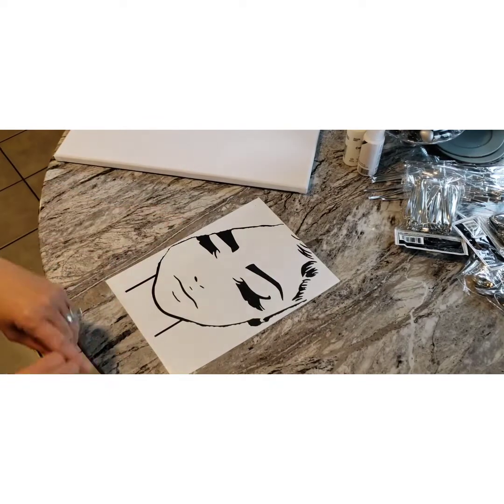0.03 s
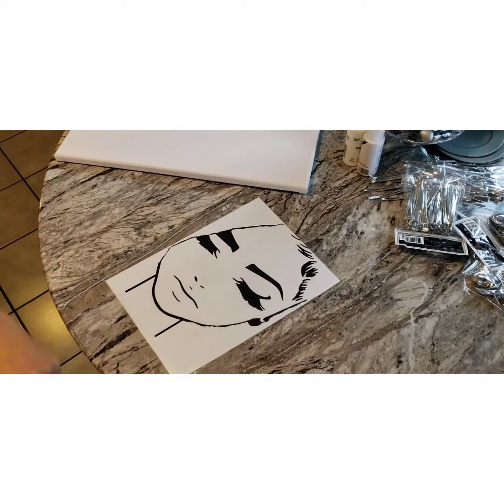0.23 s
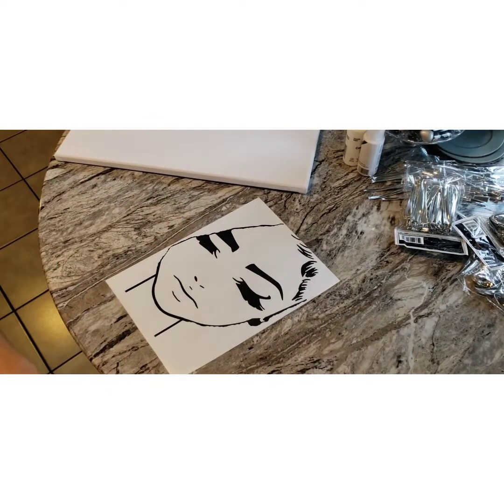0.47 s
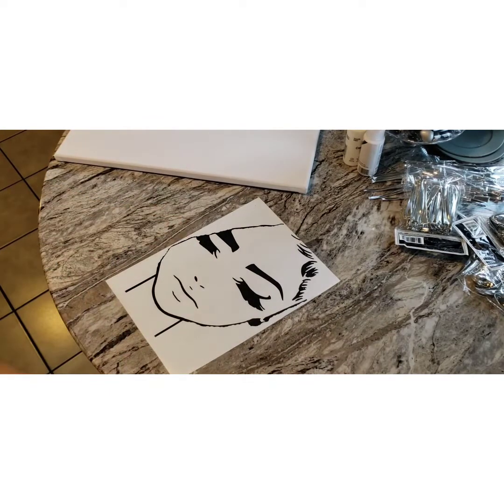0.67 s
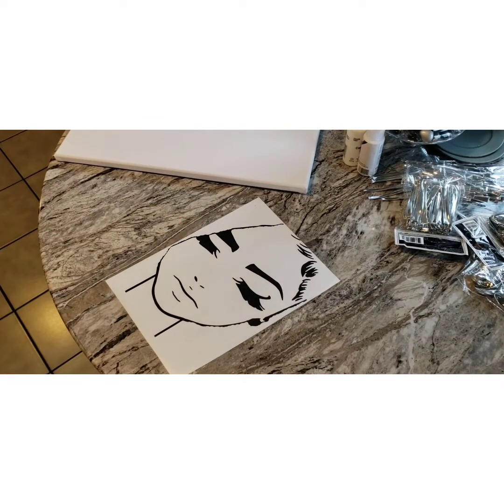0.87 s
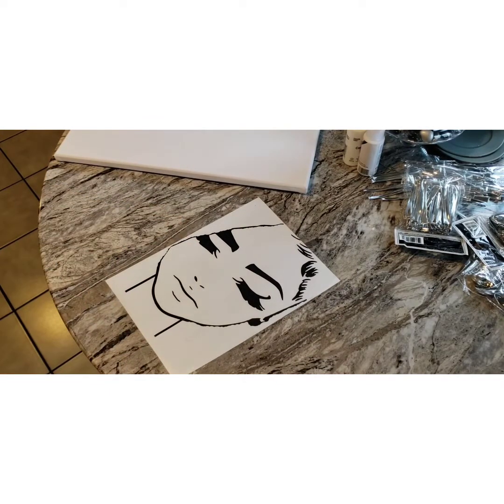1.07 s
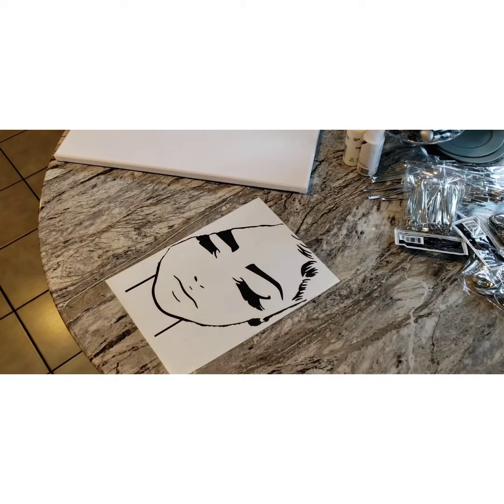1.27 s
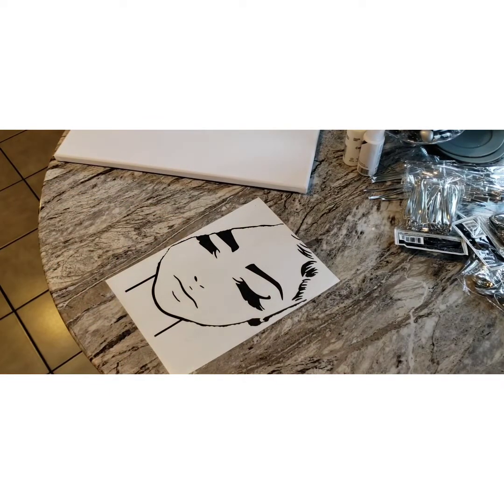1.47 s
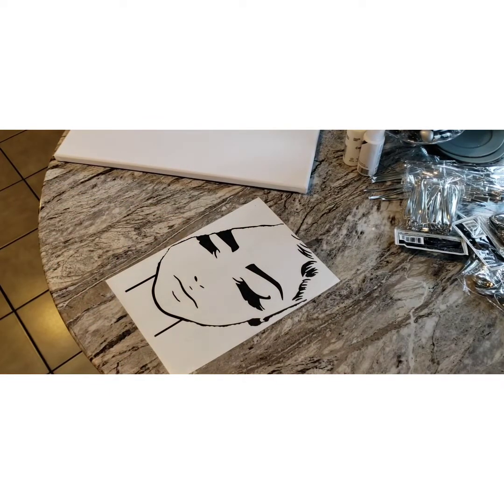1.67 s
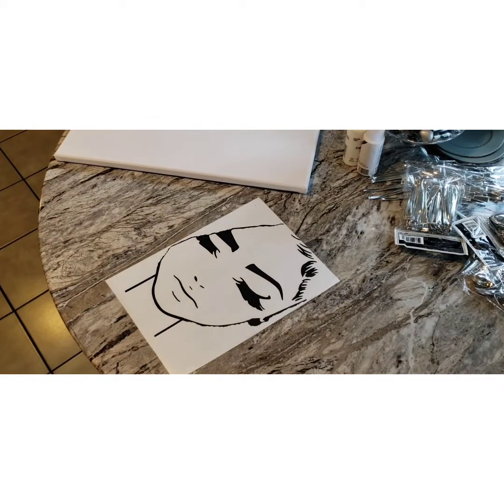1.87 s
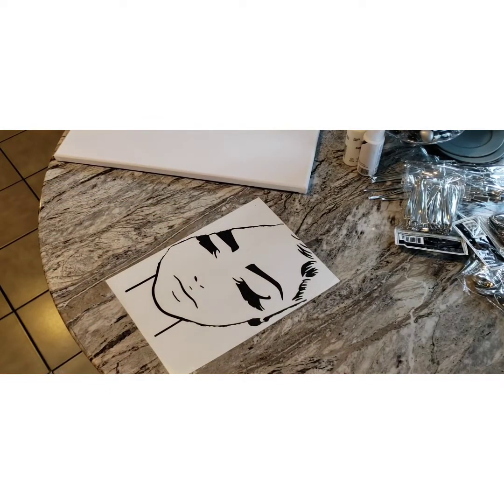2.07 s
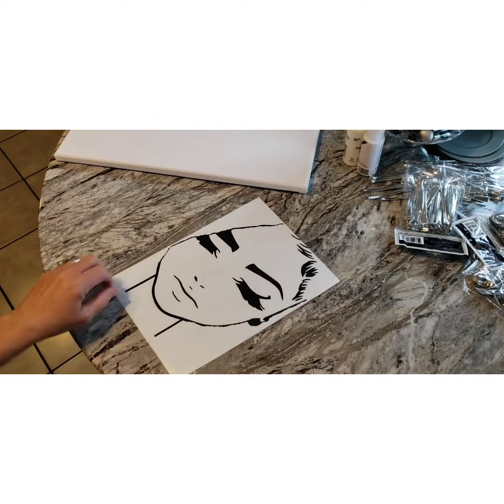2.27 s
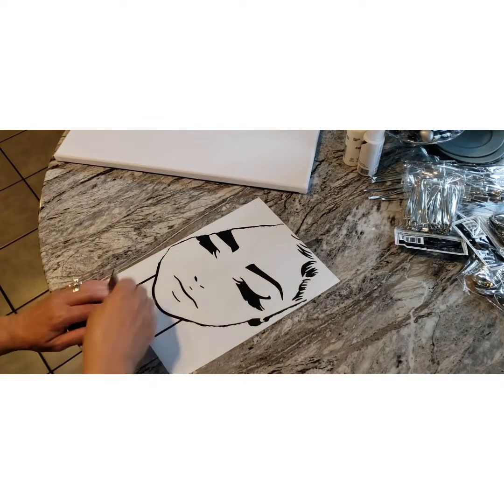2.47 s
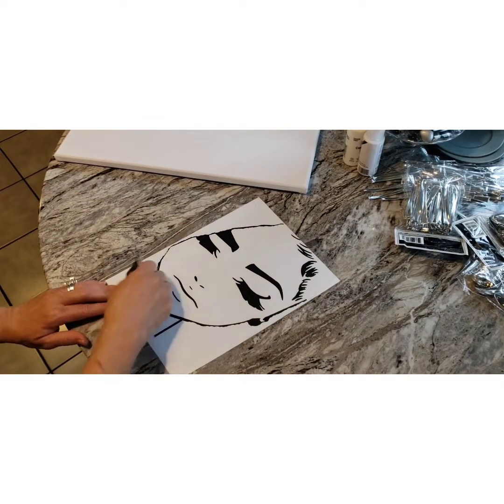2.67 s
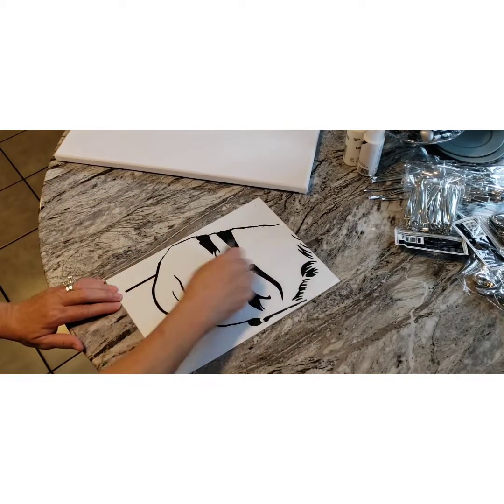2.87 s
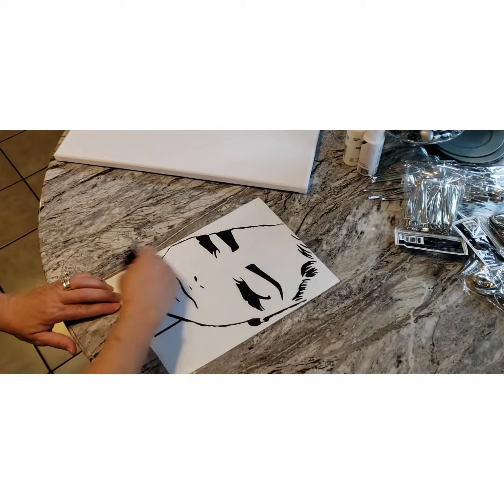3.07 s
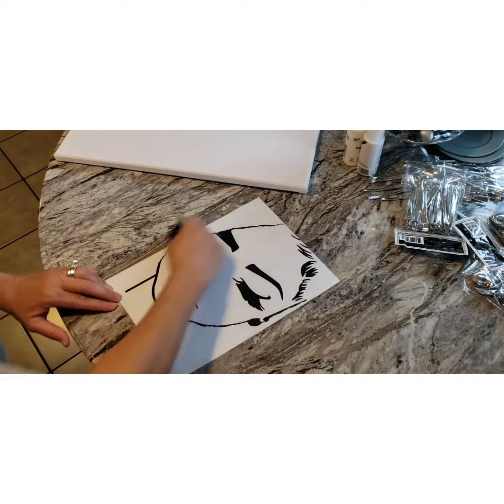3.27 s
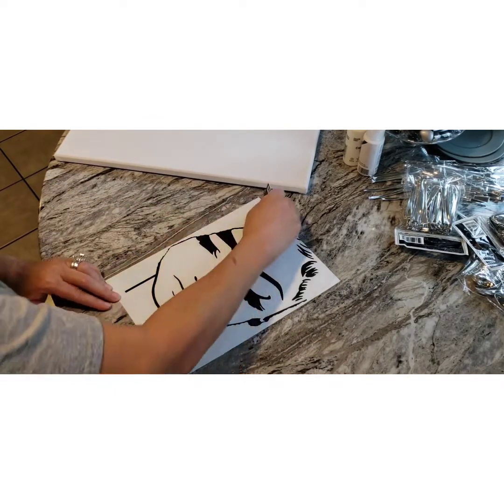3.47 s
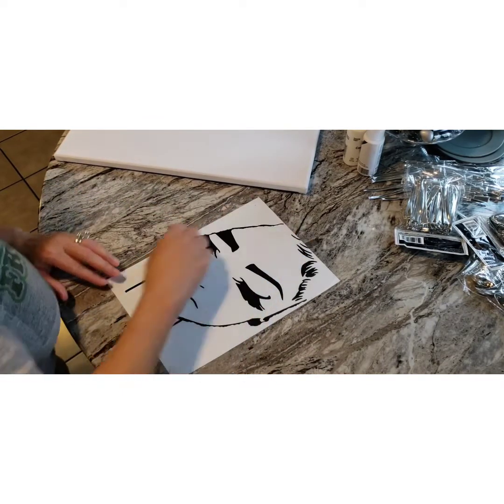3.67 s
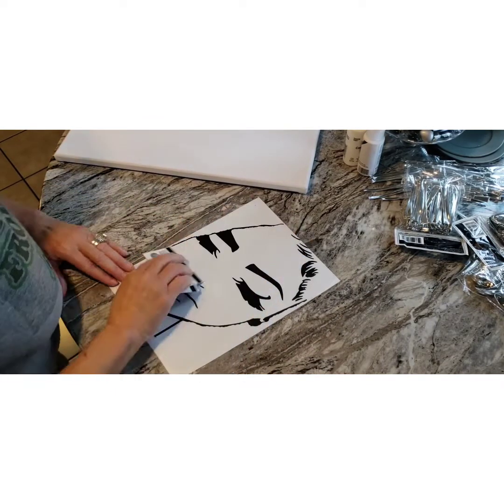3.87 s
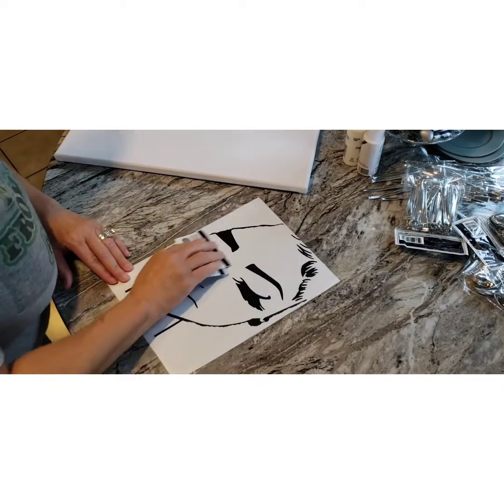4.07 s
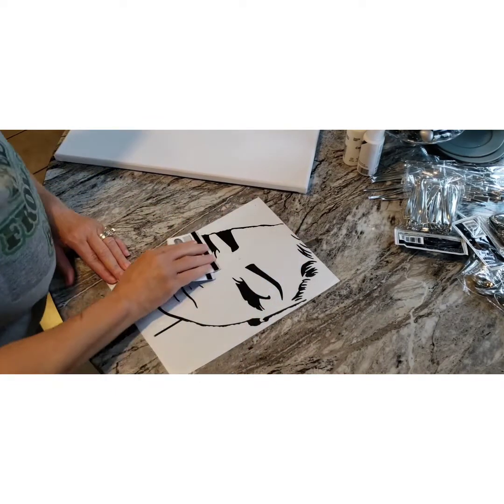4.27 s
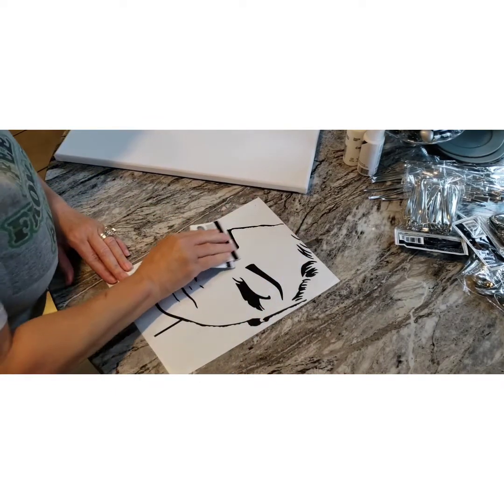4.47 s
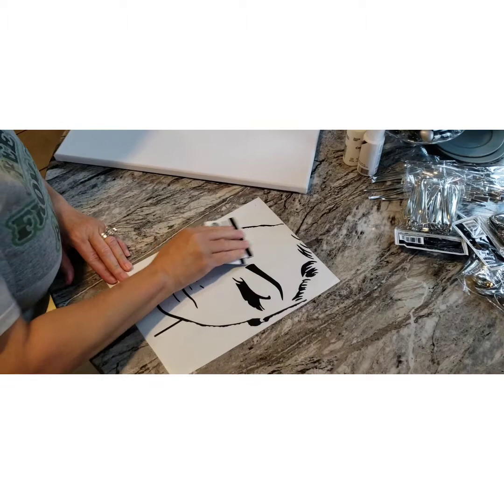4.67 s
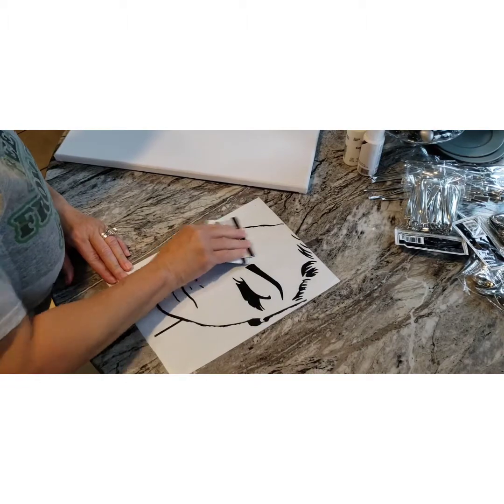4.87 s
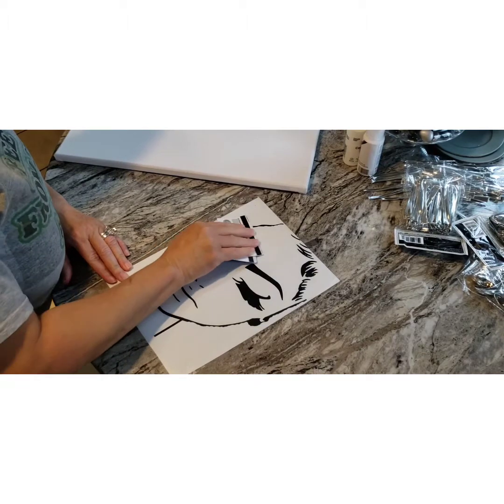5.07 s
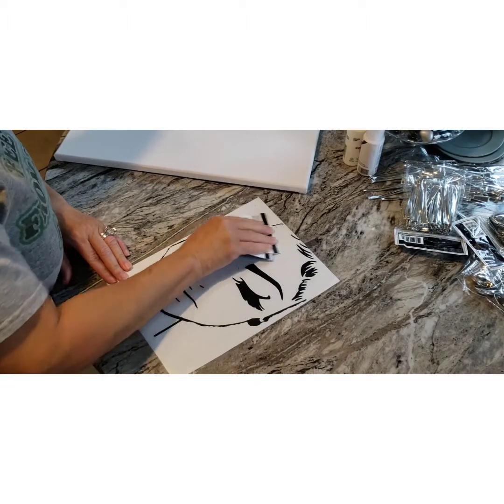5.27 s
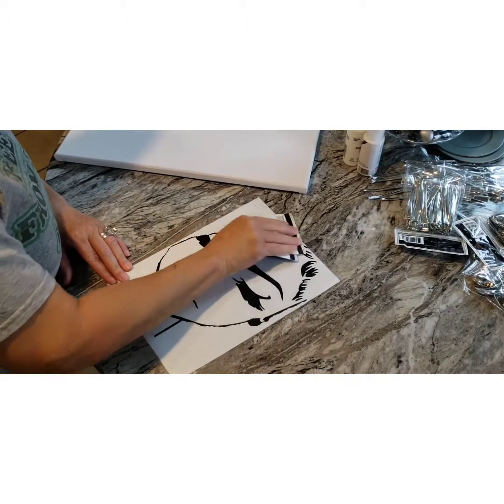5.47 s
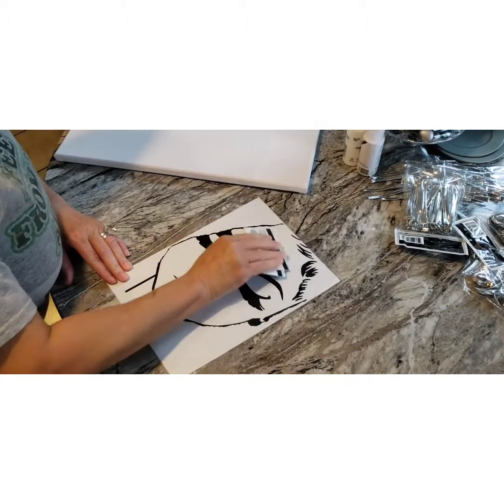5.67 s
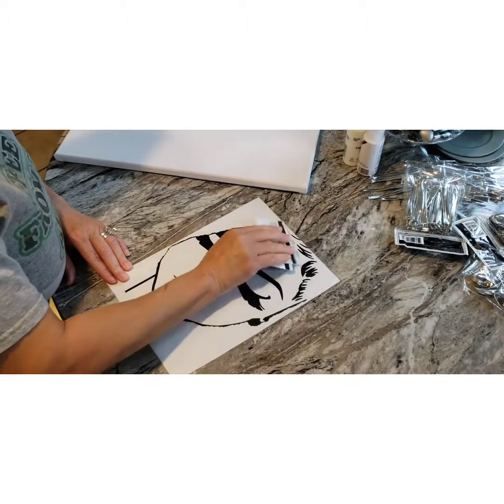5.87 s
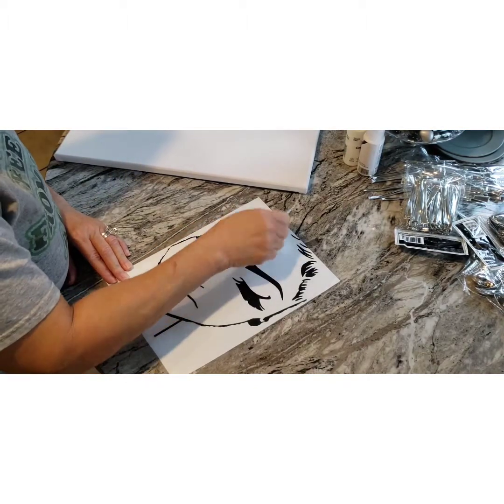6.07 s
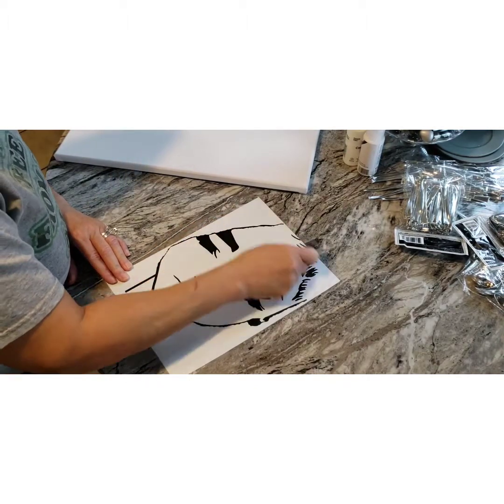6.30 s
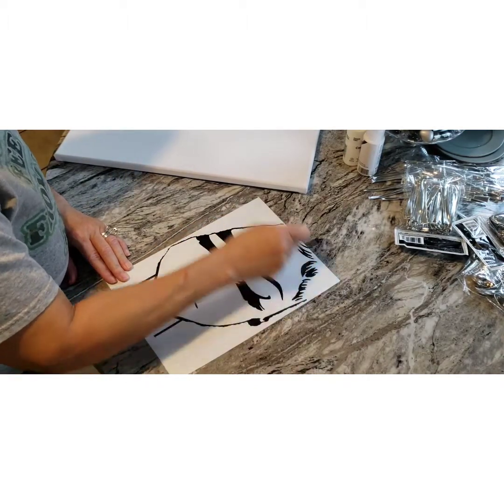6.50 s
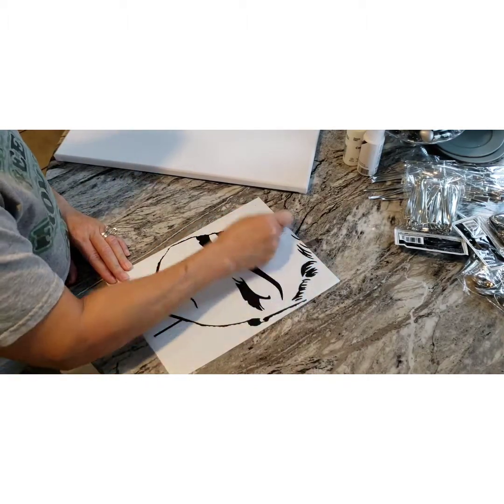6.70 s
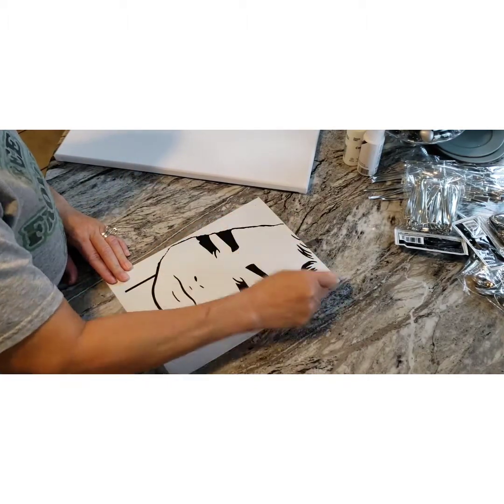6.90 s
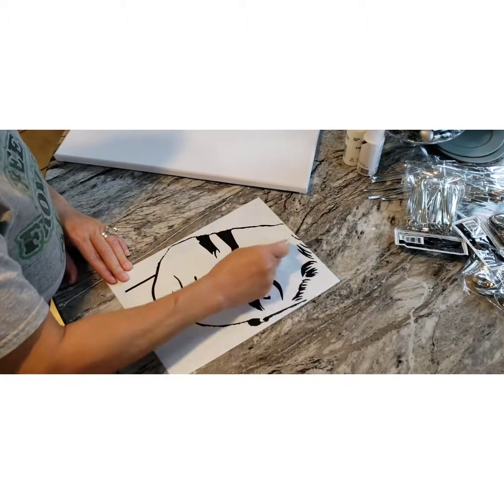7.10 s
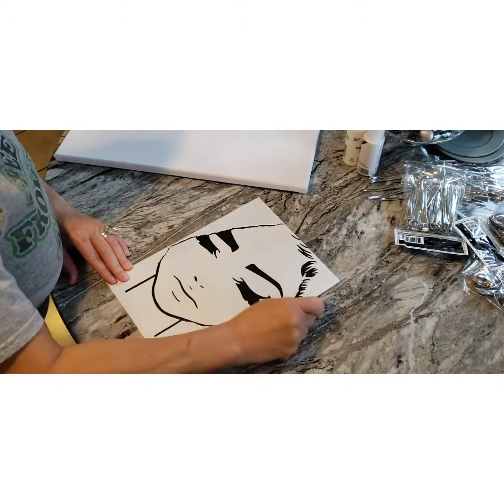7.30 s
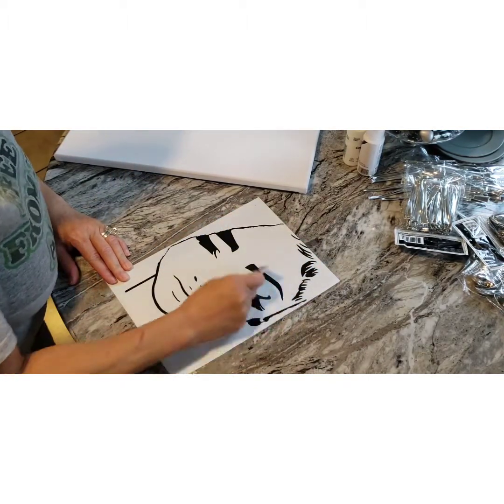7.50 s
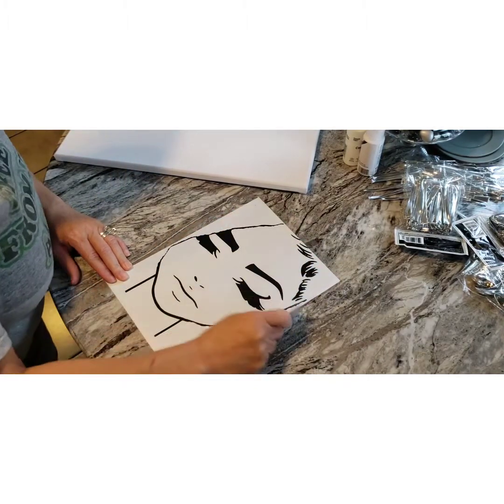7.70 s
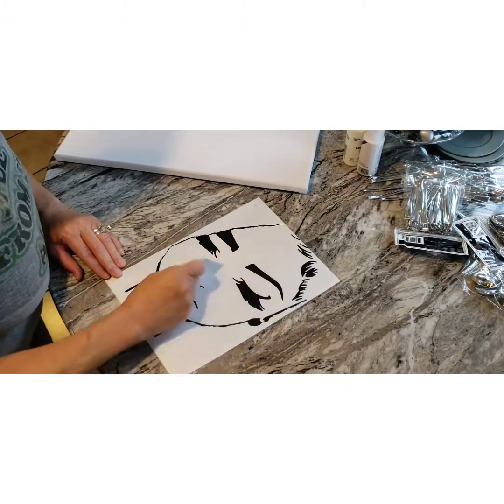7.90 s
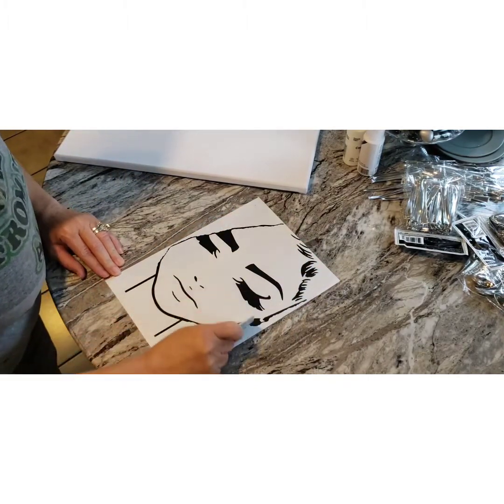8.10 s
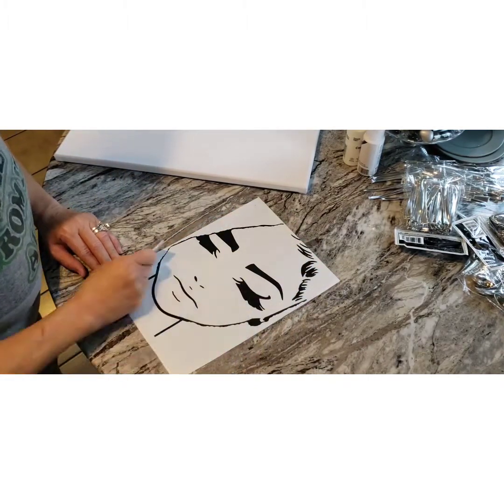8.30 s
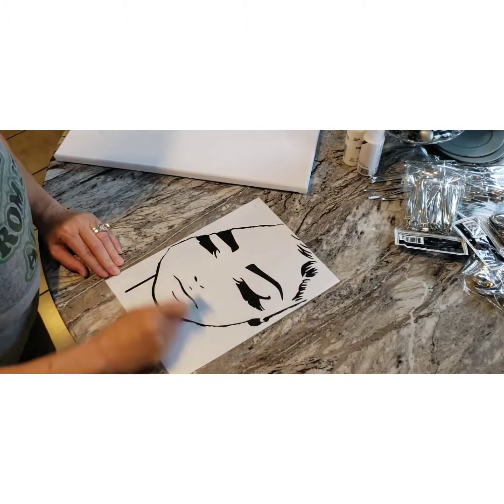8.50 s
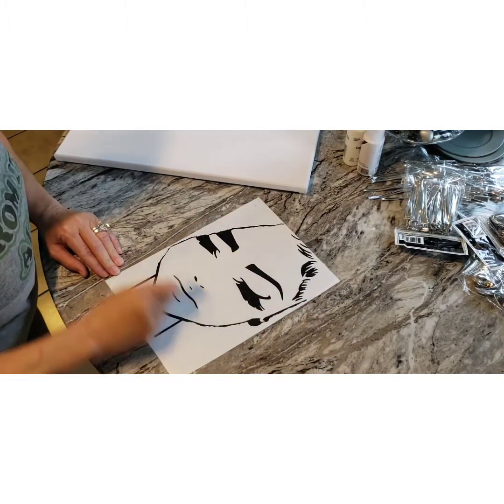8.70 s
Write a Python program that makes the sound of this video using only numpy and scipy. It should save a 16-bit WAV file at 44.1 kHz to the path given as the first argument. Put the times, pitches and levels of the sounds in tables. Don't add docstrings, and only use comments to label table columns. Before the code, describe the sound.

A close stereo phone pickup in a reverberant kitchen, with faint fridge hum and microphone hiss. From 0 to 2.5 s it is almost quiet: a paper and sleeve rustle fading at the start, tiny taps near 0.8 and 1.0, then arm and cloth brushing with a soft thud around 2.2. At 2.6 a plastic card clacks down and skids; from 2.8 to 3.5 it drags in loud, grating, chattering bursts with a honking midrange ring near 1.9 kHz. From 3.9 to 5.7 come about a dozen quick, drier to-and-fro rubs, softer, over low slab thumps. A near pause with light cloth rustle lasts until 6.15, when a clack and hissy skid arrive. Then separate firm scrapes come at 6.35, 6.65, 7.1, 7.5, 7.95 and 8.35, each with a sharp crack, raspy drag, occasional bright crackle and short hard-walled echo, continuing to the end at about 8.6.

```python
import sys
import numpy as np
from scipy import signal
from scipy.fft import rfft, irfft, next_fast_len
from scipy.io import wavfile
from scipy.ndimage import uniform_filter1d, map_coordinates

SR = 44100
rng = np.random.default_rng(int(sys.argv[2]) if len(sys.argv) > 2 else 0)


def nominal_scale(level):
    x = np.asarray(level, float) / 20
    return 10 ** x


def wrap_up_sound(samples):
    columns = np.atleast_2d(samples).T
    tamed = np.clip(columns, -1, 1)
    steps = np.round(tamed * 32767).astype(np.int16)
    wavfile.write(sys.argv[1], SR, steps)


N = 385821
STEP = 32
STEADY_TOP_HZ, TOP_HZ = 15800, 16500

# freq_hz, level_db per Hz
ROOM_TONE = [(15, -60), (28, -24.5), (45, -11), (100, -4), (147, -16), (180, 1.5), (210, -8), (300, -6),
             (400, -7.5), (540, -12), (700, -18), (900, -31), (1300, -42), (2000, -87)]
# freq_hz, likeness
ROOM_TONE_ALIKE = [(60, 0.73), (240, 0.76), (950, -0.31), (3770, -0.04), (15000, -0.35)]
ROOM_TONE_DB = -57
# freq_hz, level_db
FRIDGE_LINES = [(91.5, -78), (118.4, -72), (177.6, -66.5), (236.9, -80.5), (306.8, -74), (360.7, -71.5),
                (446.8, -76), (538.3, -78.5), (720, -85.5)]
# peak_s, level_db, coming_db_per_s, going_db_per_s
ARM_BRUSHES = [
    (0, -77, 99, 120),
    (.765, -71.5, 400, 170),
    (1.04, -85, 40, 40),
    (1.52, -89, 25, 25),
    (2.215, -69, 700, 60),
    (2.243, -66, 292, 200),
    (2.265, -67.5, 900, 130),
    (2.572, -67.5, 3000, 103),
]
# peak_s, level_db, coming_db_per_s, going_db_per_s
PAPER_BRUSHES = [(0, -59.5, 99, 180), (.77, -79, 280, 70), (.985, -80, 900, 200), (1.52, -81, 100, 120),
                 (2.21, -77.5, 700, 60.1), (2.26, -76.5, 170, 70), (2.49, -72.5, 160, 180),
                 (2.6, -73, 250, 900)]
# peak_s, level_db, coming_db_per_s, going_db_per_s
CLOTH_BRUSHES = [(0, -69, 99, 45), (.25, -68.5, 80, 60), (.51, -71.5, 75, 90), (.76, -78, 500, 25),
                 (1.04, -80, 22, 80), (1.52, -75.5, 95, 130), (2.35, -64, 110, 80),
                 (2.49, -65.5, 41.7, 100), (2.6, -67, 75, 600), (3.76, -71, 61, 90), (5.95, -71.5, 400, 30),
                 (6.05, -78, 60, 150)]
LAST_BRUSH_S = 6.2
# freq_hz, level_db per Hz
ARM_SPECTRUM = [(600, -19), (1000, 3), (1800, -1.5), (3000, -8), (6000, -38.5)]
PAPER_SPECTRUM = [(1500, -8), (2800, 1.5), (5000, -2.0), (8000, -14.0), (12000, -35)]
CLOTH_SPECTRUM = [(5000, -18.0), (9500, -8.5), (12000, -1.5), (15500, -7.5)]

# start_s, peak_db, then relative to it thud_db, snap_db, tick_db
LANDINGS = [(0.769, -76, 12, -12, -20), (0.985, -75, 4, -4, -9), (2.169, -78, 22, -7, -12),
            (2.26, -56, 0, -12, -15.5), (2.571, -61.5, 15.5, -17.5, -22), (2.607, -41, -4.5, -5, -11),
            (3.089, -29.5, -20, -41, -24), (3.37, -30, -14, -6.5, -26.5), (5.939, -62, -35, -21, -12),
            (6.148, -41, 6, -18.5, -10), (6.155, -35.5, -13, 0.5, -16.5), (6.642, -35, -14.5, -7, -23.5),
            (6.767, -28, -30, -2.5, -10.5), (7.105, -22.5, -12, -20, -25), (7.511, -28, -16, -4, -30.5),
            (7.93, -37.5, -15, -2.5, -9.5), (8.023, -30, -46, -18, -22.5), (8.333, -30, -10, -26, -23.5),
            (8.538, -29, -27, -3.5, -23)]
# freq_hz, width_hz, level_db
SLAB_STRUCK = [(149, 38, -2.5), (250, 130, -8.5), (396, 67, -4), (458.3, 26, 1), (680, 44, -8.5)]
# freq_hz, width_hz, level_db
SLAB_ROCKED = [(177, 31, -6.0), (231, 61, -2.5), (378, 24.0, -1.5), (468.0, 29, -2.0), (664, 79, -15.5)]
# start_s, low_db, dying_db_per_s, upper_over_low_db, cabinet_over_low_db
JOLTS = [
    (6.158, -41, 398, -9, -26),
    (6.645, -55, 78, 4, -13),
    (7.11, -43, 110, -22, -11),
    (7.515, -43.5, 194, -2.5, -8),
    (7.935, -50.5, 130, 2.5, -7),
    (8.34, -50.5, 113, 2.5, -3),
]
# peak_s, low_db, swell_db_per_s, upper_over_low_db, cabinet_over_low_db
LEANS = [(2.602, -59, 95, 3, -4), (2.906, -55.5, 174, 8, -20), (3.12, -65, 93, 3.5, 1),
         (3.44, -53, 91, -1, -10), (3.94, -56.5, 126, 6, -6), (4.045, -46.5, 220, -3.5, -13),
         (4.1, -43, 250, -10.5, -18), (4.19, -45, 300, -10.5, -12), (4.38, -56, 115, 2.5, -7),
         (4.46, -64, 90, 7, -10), (4.56, -61, 40, 3, -17), (4.69, -53.5, 123, 0.5, -16),
         (4.79, -56, 200, -4, -15), (4.86, -55.5, 90, -5, -15), (4.96, -60, 40, 4.5, -12),
         (5.07, -57, 120, 4.5, -5), (5.2, -63, 98, 15.5, -10), (5.27, -51.5, 170, -5, -10),
         (5.34, -65.5, 150, 11.5, -8), (5.4, -61, 150, 7.5, -15), (5.48, -55, 200, 8.5, -14),
         (5.52, -40, 234, -8, -9), (5.6, -48.5, 154.5, -11.5, -9.5), (6.3, -56.5, 32, 7, -9.5),
         (6.8, -51, 58, -0.5, -20), (6.923, -47.5, 150, -1, -13), (7.66, -62.5, 88, 11, -25),
         (8.1, -71.5, 66, 15.5, -13), (8.58, -66, 80, 1, -8)]
JOLT_HOLD_S, UPPER_PACE, BUMP_PACE = 0.032, 0.99, 0.54

# ratio to the note, relative width, level_db
CARD_MODES = [(1.041, 0.27, 9.5), (1.64, 0.22, 3), (0.853, 0.2, 5), (3.9, 0.33, -17.5)]
# freq_hz, level_db per Hz
RASP = [(650, -50.5), (1100, -12), (1570, -5.5), (2830, 1), (3670, -3), (4900, -6.5), (8000, -25),
        (10400, -55), (17600, -120)]
# freq_hz, level_db per Hz
EDGE_HISS = [(2350, -25), (4000, -11), (5230, -4.5), (6270, -7), (8730, -8.5), (10800, -5), (15600, -9.5)]
# freq_hz, likeness
SCRAPE_ALIKE = [(500, 0.8), (1000, 0.4), (1800, 0.26), (3000, 0.15), (7000, 0.043), (14000, 0.022)]
# freq_hz, left_over_right_db
LEFT_OVER_RIGHT = [(60, -2), (240, -16), (950, 0.0), (3770, 0.5), (15000, -4)]
# start_s, level_db, dying_db_per_s
SKIDS = [
    (2.608, -46, 156),
    (3.083, -34.5, 193),
    (5.938, -61.5, 300),
    (6.153, -45.5, 46.5),
    (6.641, -57, 120),
    (7.105, -34.5, 421),
    (7.51, -35, 257.5),
    (7.93, -49, 70),
    (8.335, -43, 163),
]
# bite_s, lift_s, bite_db, lift_db, onset_db_per_s
DRAGS = [(2.775, 2.84, -44, -35.5, 449.5), (2.85, 2.898, -35.5, -30, 600.5), (3.2, 3.25, -42, -35.5, 249.5),
         (3.258, 3.335, -35.5, -36, 599.5), (3.35, 3.455, -36.5, -31.5, 200.5),
         (6.358, 6.395, -40, -41.5, 215), (6.4, 6.45, -40.5, -51, 600), (6.772, 6.89, -37, -33, 168.5),
         (7.163, 7.233, -40.5, -35.5, 598), (7.235, 7.296, -36, -32, 598.5), (7.57, 7.665, -40, -37, 212.5),
         (7.985, 8.035, -37.5, -30.5, 601), (8.04, 8.125, -31.5, -42, 600),
         (8.49, 8.545, -35.5, -34.5, 244.5), (8.55, 8.605, -32, -37.5, 602)]
# start_s, level_db, onset_db_per_s, dying_db_per_s, hold_s
RUBS = [(3.86, -49.5, 600, 128, 0.0057), (4.02, -51.5, 340, 209, 0.1), (4.23, -50.5, 300, 179, 0.0048),
        (4.4, -47, 271, 195, 0.011), (4.535, -54.5, 200, 245, 0.0073), (4.68, -47.5, 389, 190, 0.0053),
        (4.795, -56.5, 200, 225, 0.0039), (4.94, -46.5, 334, 198, 0.005), (5.05, -56.5, 154, 229, 0.0047),
        (5.185, -47, 489, 232, 0.014), (5.305, -57, 215, 290, 0.0061), (5.45, -48, 398, 178, 0.012),
        (5.585, -43.5, 548, 229, 0.0093)]
# time_s, note_hz, edge sharpness hiss_db, ringing 0-1, sheet looseness sheet_db
GRIP = [(2.62, 1930, -9, 0, -2.5), (2.78, 1836, -14, 1, 5), (2.9, 2080, -7, 0.88, -7.5),
        (3.1, 1790, -10, 0.87, -7), (3.27, 2000, -12.5, 1, -4), (3.45, 2040, -10, 0.93, -4.5),
        (3.86, 1880, -13, 0.18, -5.5), (4.06, 1780, -7, 0.63, 4), (4.4, 1870, -4.5, 0.25, -3.5),
        (4.95, 1870, -3.5, 0.3, 1.5), (5.6, 1715, -6, 0.39, -1), (5.94, 1550, -24, 1.2, -3.5),
        (6.22, 2070, 1.5, 0.85, 2), (6.37, 1795, -6, 0.72, 10), (6.85, 1840, -4.5, 0.44, 1.5),
        (7.2, 1670, -8.5, 0.89, 2.5), (8.0, 1670, -9.5, 0.96, 2.5), (8.55, 1833, -6, 0.71, 1.7)]
SKID_NOTE, SKID_RING, SKID_SHEET_DB = 1.04, -0.34, -4.5
SKID_HISS_DB = -3
DRAG_SHEET_DB, SHEET_LEAD, RUB_SHEET_DB = -13.5, 0.63, -6.5
HISS_FADE_DB_S, HISS_FADE_MAX_DB, RING_FADE_S = 43, 36, 1.45
LAND_DB_S, LIFT_DB_S = 12000, 198
BITE_HISS_DB, BITE_S, DRAG_RING_LOSS = -4, 0.035, 0.19
BEND, SAG_PER_S = 0.046, .4

# start_s, peak_db, note_hz
PLUCKS = [(2.777, -35, 1610), (2.7945, -29, 1650), (2.8534, -22.5, 2130), (2.8654, -23, 2010),
          (2.8854, -21, 1900), (2.8944, -22, 1920), (3.0942, -22.5, 1856), (3.108, -24, 1930),
          (3.2053, -31, 1880), (3.2306, -22, 1720), (3.254, -18, 2034), (3.2694, -20, 2020),
          (3.2931, -20.5, 1960), (3.3712, -21.5, 2250), (3.4411, -33, 2020), (3.4554, -28, 2070),
          (5.5816, -35, 1580), (5.5944, -32, 1580), (6.356, -36, 1780), (6.6548, -29.5, 2100),
          (6.7575, -28, 1940), (6.8059, -29, 1560), (6.8489, -26, 1820), (6.8953, -24, 1485),
          (7.1652, -39, 1900), (7.2476, -19.5, 1710), (7.2784, -29, 1800), (7.294, -29, 1540),
          (7.5722, -25.5, 1570), (7.6225, -30, 1880), (7.65, -37, 1530), (7.9818, -24, 1880),
          (7.9912, -19.5, 1714), (8.0025, -17, 1723), (8.0274, -28, 1700), (8.0384, -28, 1670),
          (8.0628, -26, 1710), (8.454, -30, 1620), (8.4902, -21, 1860), (8.564, -30, 2010),
          (8.5954, -22, 1660)]
PLUCK_T60_S, PLUCK_RISE_S, PLUCK_DB = .035, 0.001, -5
# start_s, peak_db, length_s
CATCHES = [
    (3.37, -25, .004),
    (6.22, -42, .004),
    (6.287, -37.5, .003),
    (6.767, -22, 0.0037),
    (7.283, -34, .004),
    (8.004, -43, 0.0027),
    (8.023, -26, .003),
    (8.538, -22.5, 0.0074),
]

# freq_hz, t60_s
WALLS = [(130, 0.45), (1000, 0.32), (4000, 0.26), (7500, 0.26), (12000, 0.19)]
# freq_hz, likeness
WALLS_ALIKE = [(130, 0.94), (300, 0.97), (700, 0.46), (1500, 0.017)]
# freq_hz, level_db per Hz
SELF_NOISE = [(530, -24.5), (900, -10), (1050, -7), (1320, -10), (1510, -8.5), (3240, -15), (7660, -24.5),
              (15700, -8.5)]
SELF_NOISE_DB = -80


def unit(x):
    return x / np.sqrt(np.mean(x ** 2) + 1e-20)


def along(points, hz):
    f, v = np.transpose(points)
    return np.interp(np.log(hz + 1), np.log(f + 1), v)


def curves(rows):
    s, *cols = np.transpose(rows)
    return [np.interp(np.arange(N) / SR, s, c) for c in cols]


def columns(rows):
    return np.transpose(rows)[..., None]


def smooth(x):
    return np.interp(np.arange(N) / STEP, np.arange(len(x)), x)


def wobble(rate):
    knots = rng.standard_normal(int(N * rate / SR) + 4)
    return map_coordinates(knots, [np.arange(N) * rate / SR])


def filtered(x, response):
    m = next_fast_len(x.shape[-1] + 8192)
    spectrum = rfft(x, m) * response(np.fft.rfftfreq(m, 1 / SR))
    return irfft(spectrum, m)[..., :x.shape[-1]]


def coloured(x, spectrum):
    return unit(filtered(x, lambda hz: nominal_scale(along(spectrum, hz)) * (hz < STEADY_TOP_HZ)))


def resonances(f, modes):
    total = 0
    for k, (centre, width, db) in enumerate(modes):
        damping = 1j * f * width
        total = total + (-1) ** k * nominal_scale(db) * damping / (centre * centre - f * f + damping + 1e-9)
    return total


def paired(pair, alike):
    def mid_side(hz):
        turn = np.arccos(np.clip(along(alike, hz), -1, 1)) / 2
        return np.array([np.cos(turn), np.sin(turn)])

    mid, side = filtered(pair, mid_side)
    return np.array([mid + side, mid - side])


def swells(s, db, rise, fall, hold=0):
    t = np.arange(0, N + STEP, STEP) / SR
    after = np.maximum(t - s - hold, 0)
    return db - rise * np.maximum(s - t, 0) - fall * after, after


def landed(rows, s):
    first = np.append(0, columns(rows)[0])
    return swells(first[np.searchsorted(first, s) - 1], 0, LAND_DB_S, 0)[0]


def kitchen():
    t = np.arange(N) / SR
    air = coloured(paired(rng.standard_normal((2, N)), ROOM_TONE_ALIKE), ROOM_TONE)
    hum = 0
    for hz, db in FRIDGE_LINES:
        hum = hum + nominal_scale(db + 5 + 1.4 * wobble(6)) * np.sin(2 * np.pi * hz * t + .5 * wobble(4))
    return nominal_scale(ROOM_TONE_DB - 3.5 + 1.1 * wobble(3.9)) * air + hum


def sleeves():
    n = round(LAST_BRUSH_S * SR)

    def brush(rows, gain_db, spectrum):
        level_db = smooth(swells(*columns(rows))[0].max(axis=0))[:n]
        noise = coloured(rng.standard_normal((2, n)), spectrum)
        return nominal_scale(level_db + gain_db + 1.5 * wobble(40.34)[:n]) * noise

    arm = brush(ARM_BRUSHES, 2.5, ARM_SPECTRUM)
    paper = brush(PAPER_BRUSHES, 3.0, PAPER_SPECTRUM)
    cloth = brush(CLOTH_BRUSHES, 1.0, CLOTH_SPECTRUM)
    return np.pad(arm + paper + cloth, ((0, 0), (0, N - n)))


def landings():
    crack, blows, t = np.zeros(N + SR), np.zeros(N), np.arange(SR // 20) / SR
    for s, db, thud_db, snap_db, tick_db in LANDINGS:
        burst = nominal_scale(-60 * t / 0.01) * rng.standard_normal((3, len(t)))
        burst[:, 0] = -nominal_scale(14)
        clack = filtered(burst[0], lambda f: resonances(f, [(1580, 1950, 0.1)]) ** 2)
        snap = filtered(burst[1], lambda f: resonances(f, [(2960, 1800, 8.5), (5280, 8600, -4.5)]))
        shorter = burst[2] * nominal_scale(-60 * t / 0.0078)
        tick = filtered(shorter, lambda f: resonances(f, [(11200, 4100, 0.1)]))
        hit = nominal_scale(db - 2.0) * clack + nominal_scale(db + snap_db) * snap + nominal_scale(db + tick_db + 10.5) * tick
        crack[round((s + .0009) * SR):][:len(t)] += hit
        blows[round((s + .003) * SR)] = -nominal_scale(db + thud_db + 46.5)
    return crack[:N], filtered(blows, lambda f: resonances(f, SLAB_STRUCK))


def pressure():
    s, db, fall, upper, cabinet = columns(JOLTS)
    at, lean_db, swell, lean_upper, lean_cabinet = columns(LEANS)

    def level(jolt_over, lean_over, pace):
        jolts = swells(s, db + jolt_over, LAND_DB_S, pace * fall, JOLT_HOLD_S)[0]
        leans = swells(at, lean_db + lean_over, pace * swell, pace * swell)[0] + landed(JOLTS, at)
        return smooth(np.vstack([jolts, leans]).max(axis=0))

    return level(0, 0, 1.0), level(upper, lean_upper, UPPER_PACE), level(cabinet, lean_cabinet, BUMP_PACE)


def slab():
    low_db, upper_db, bump_db = pressure()

    def shaken(modes):
        return unit(filtered(rng.standard_normal(N), lambda f: resonances(f, modes)))

    phase = 2 * np.pi * 137 * np.arange(N) / SR + 2.0 * wobble(11)
    tone = np.sqrt(2) * nominal_scale(3.4 * wobble(25)) * np.sin(phase)
    low = filtered(nominal_scale(low_db - 2.0) * tone, lambda f: resonances(f, [(139, 130, 0.1)]))
    upper = nominal_scale(upper_db - 2.5) * shaken(SLAB_ROCKED)
    bump = nominal_scale(bump_db - 2.0) * shaken([(49.5, 51, 0.1)])
    return low + upper + bump


def grain(spike_db, clump_db):
    size_db = spike_db * np.minimum(rng.exponential(size=N), 5) + clump_db * wobble(220)
    return unit(rng.standard_normal((2, N)) * nominal_scale(size_db))


def patchy(x, depth_db):
    z = signal.stft(x, nperseg=512)[2]
    field = uniform_filter1d(rng.standard_normal(z.shape[1:]), size=6, axis=0)
    field = uniform_filter1d(field, size=9, axis=1)
    return unit(signal.istft(z * nominal_scale(depth_db * unit(field)), nperseg=512)[1][:, :N])


def motion():
    s, db, fall = columns(SKIDS)
    bite, lift, bite_db, lift_db, rise = columns(DRAGS)
    first = bite[np.searchsorted(bite[:, 0], s[:, 0])]
    skid_db, skid_after = swells(s, db, LAND_DB_S, fall)
    skid_db = skid_db + swells(first, 0, 0, LIFT_DB_S)[0]
    since_bite = swells(first[np.searchsorted(s[:, 0], bite[:, 0]) - 1], 0, 0, 0)[1]
    fresh = np.exp(-since_bite / BITE_S)

    drag_db, drag_after = swells(bite, bite_db, rise, LIFT_DB_S, lift - bite)
    done = np.clip((np.arange(0, N + STEP, STEP) / SR - bite) / (lift - bite), 0, 1)
    waiting_db = np.where(done > 0, 0, bite_db - drag_db)
    drag_db = drag_db + done * (lift_db - bite_db) + landed(SKIDS, bite)
    rub_db, rub_after = swells(*columns(RUBS))

    level_db = np.vstack([skid_db, drag_db, rub_db])
    after = np.vstack([skid_after, drag_after, rub_after])
    top_db = level_db.max(axis=0)
    weight = nominal_scale(2 * (level_db - top_db))
    weight = weight / weight.sum(axis=0)

    def blend(skid, drag, rub):
        values = np.vstack([skid + 0 * skid_db, drag + 0 * done, rub + 0 * rub_db])
        return smooth((weight * values).sum(axis=0))

    late = smooth((weight * after).sum(axis=0))
    note_hz, sharp_db, ringing, loose_db = curves(GRIP)
    hiss_db = sharp_db + blend(SKID_HISS_DB, BITE_HISS_DB * fresh, 0)
    hiss_db = hiss_db - np.minimum(HISS_FADE_DB_S * late, HISS_FADE_MAX_DB)
    drag_sheet_db = DRAG_SHEET_DB + SHEET_LEAD * waiting_db + 40 * np.minimum(drag_after, .15)
    sheet_db = loose_db + blend(SKID_SHEET_DB, drag_sheet_db, RUB_SHEET_DB)
    ringing = ringing + blend(SKID_RING, -DRAG_RING_LOSS * (1 - fresh), 0) - RING_FADE_S * late
    drag_note = 0.93 + BEND * done - SAG_PER_S * np.minimum(drag_after, .12)
    return smooth(top_db), hiss_db, sheet_db, note_hz * blend(SKID_NOTE, drag_note, 0.93), ringing


def scrape():
    level_db, hiss_db, sheet_db, note_hz, ringing = motion()
    f, t, z = signal.stft(grain(spike_db=3.0, clump_db=1.0), SR, nperseg=512)
    note = np.interp(t, np.arange(N) / SR, note_hz)
    modes = [(ratio * note, width * note, db) for ratio, width, db in CARD_MODES]
    ring = unit(signal.istft(z * resonances(f[:, None], modes) ** 2, SR, nperseg=512)[1][:, :N])
    slips = grain(spike_db=2.0, clump_db=-1.0)
    rasp = patchy(coloured(slips, RASP), depth_db=2.5)
    sheet = unit(filtered(slips, lambda f: resonances(f, [(950, 960, 0.1)]) ** 2))
    hiss = coloured(grain(spike_db=2.5, clump_db=0.0), EDGE_HISS)
    share = np.clip(ringing, 0, 1)
    body = np.sqrt(share) * ring + np.sqrt(1 - share) * rasp
    mix = body + nominal_scale(sheet_db - 1.2) * sheet + nominal_scale(hiss_db + 0.97) * hiss
    return nominal_scale(level_db + 1.2 * wobble(35)) * mix


def plucks():
    out, t = np.zeros(N + SR), np.arange(SR // 20) / SR
    shape = nominal_scale(-60 * t / PLUCK_T60_S) * (1 - np.exp(-t / PLUCK_RISE_S))
    phases = rng.uniform(0, 2 * np.pi, (len(PLUCKS), 2))
    for (s, db, hz), phase in zip(PLUCKS, phases):
        ring = np.sin(2 * np.pi * hz * t + phase[0])
        ring = ring + nominal_scale(-11) * np.sin(2 * np.pi * 1.55 * hz * t + phase[1])
        out[round(s * SR):][:len(t)] += nominal_scale(db + PLUCK_DB) * shape * ring
    return out[:N]


def catches():
    out, t = np.zeros((2, N + SR)), np.arange(SR // 20) / SR
    for s, db, length in CATCHES:
        gain_db = 3.1 * wobble(900)[:len(t)] - 150 * np.clip(t - length, 0, 1) / .05
        burst = rng.standard_normal((2, len(t))) * nominal_scale(gain_db)
        crackle = filtered(burst, lambda f: resonances(f, [(10800, 3500, 0.1)]))
        out[:, round(s * SR):][:, :len(t)] += nominal_scale(db - 3.5) * crackle
    return out[:, :N]


def walls(x):
    out, hop = np.zeros((2, N + 2 * SR)), SR // 3
    fade = signal.windows.hann(2 * hop)
    for start in range(hop, N, hop):
        hz, t, z = signal.stft(rng.standard_normal((2, SR // 2)), SR, nperseg=256)
        decay = nominal_scale(-60 * t / along(WALLS, hz)[:, None])
        tail = signal.istft(z * decay, SR, nperseg=256)[1]
        tail = paired(tail, WALLS_ALIKE) / np.linalg.norm(tail[0])
        piece = x[start:start + 2 * hop]
        echo = signal.fftconvolve((piece * fade[:len(piece)])[None], tail, axes=1)
        out[:, start + 130:][:, :echo.shape[1]] += echo
    return out[:, :N]


def scene():
    card = scrape()
    cracks, thuds = landings()
    picks, trips = plucks(), catches()
    edge = paired(card, SCRAPE_ALIKE) + cracks + picks + trips
    near = filtered(edge, lambda hz: nominal_scale(along(LEFT_OVER_RIGHT, hz) * [[.5], [-.5]]))
    echo = walls(nominal_scale(-3.5) * (card[0] + picks + trips[0]) + nominal_scale(9.0) * cracks + nominal_scale(3.5) * thuds)
    return nominal_scale(1.5) * near + nominal_scale(-3.5) * thuds + echo + slab() + sleeves() + kitchen()


def band_limit(x):
    return signal.sosfilt(signal.butter(12, 16830, fs=SR, output="sos"), x)


def record(dry):
    hiss = nominal_scale(SELF_NOISE_DB + 3.0) * coloured(rng.standard_normal((2, N)), SELF_NOISE)
    mix = filtered(dry + hiss, lambda hz: hz < TOP_HZ)
    return band_limit(mix)


dry = scene()
out = record(dry)
wrap_up_sound(out)
```